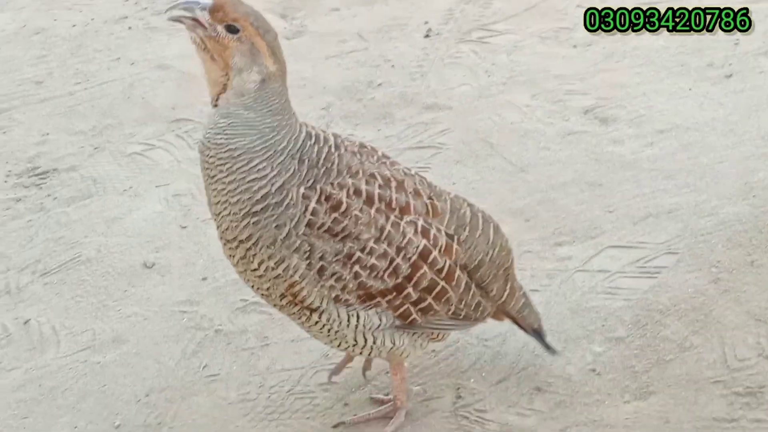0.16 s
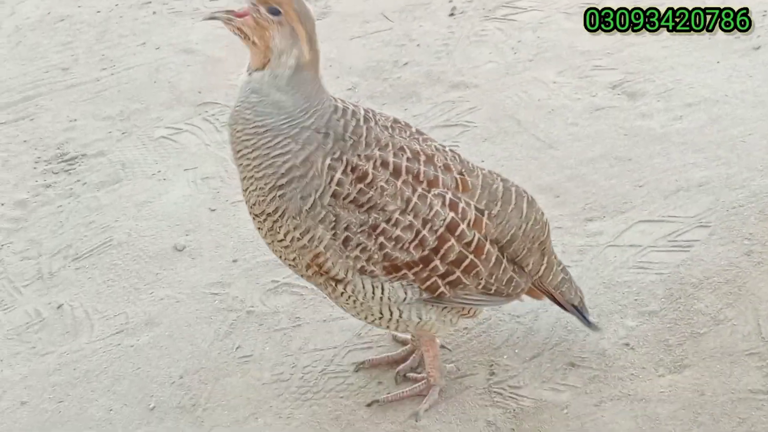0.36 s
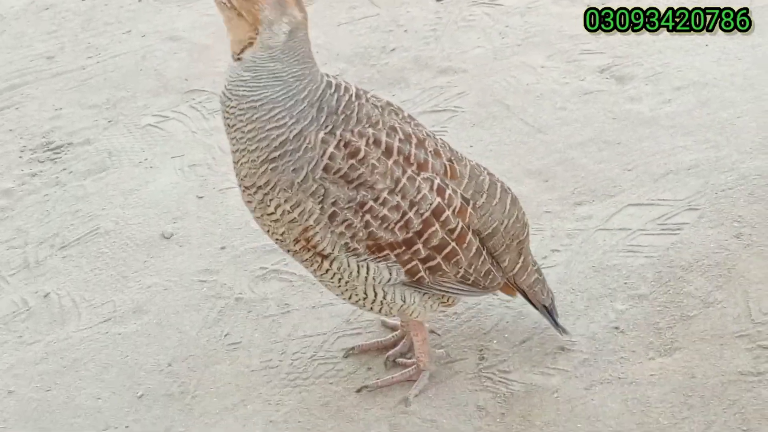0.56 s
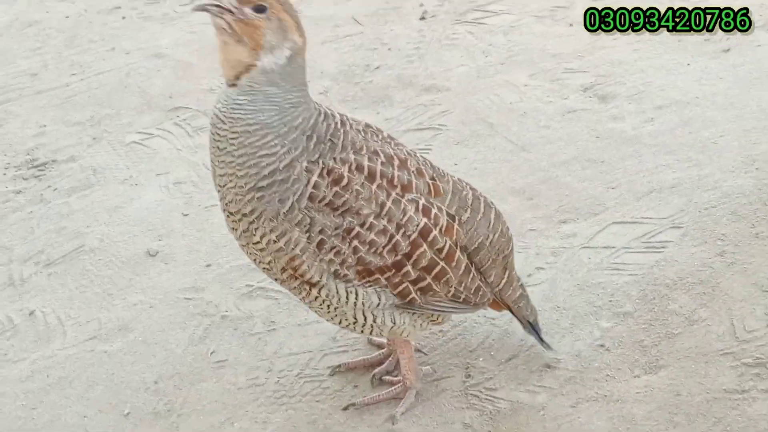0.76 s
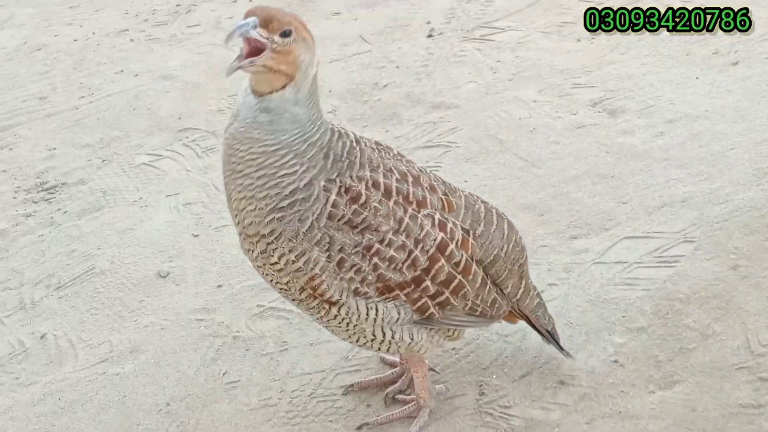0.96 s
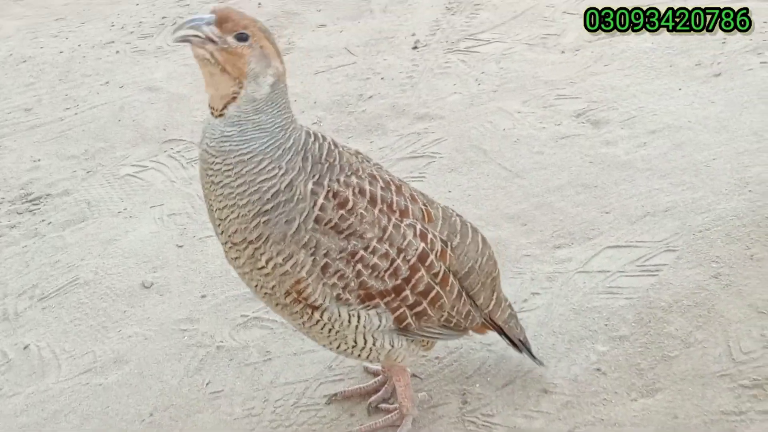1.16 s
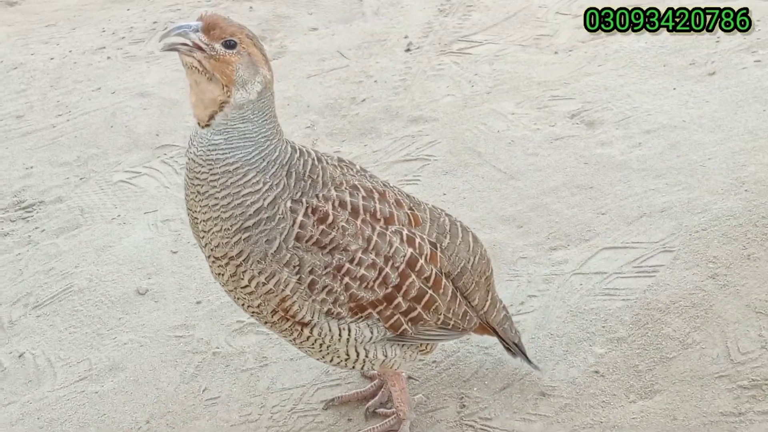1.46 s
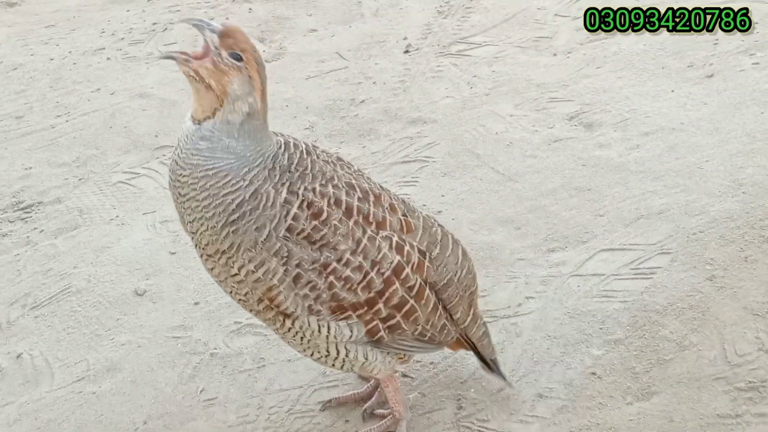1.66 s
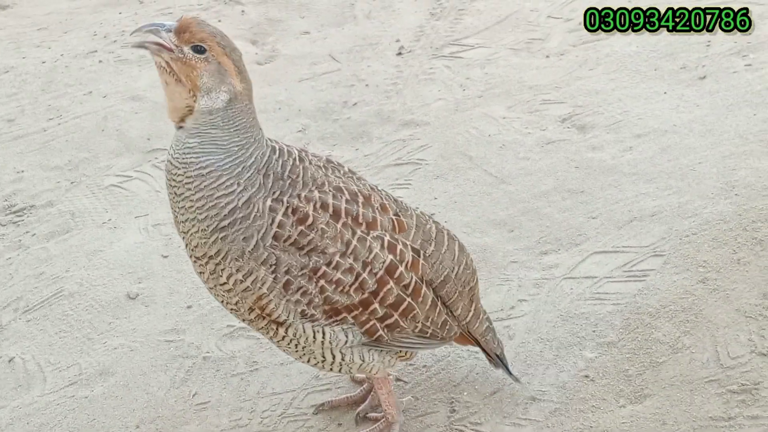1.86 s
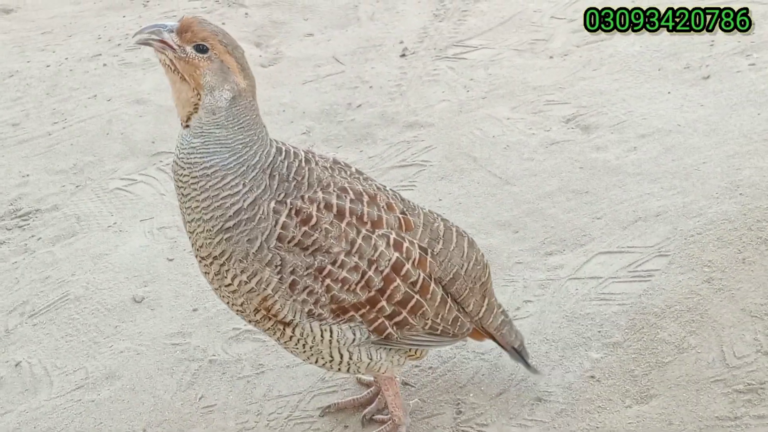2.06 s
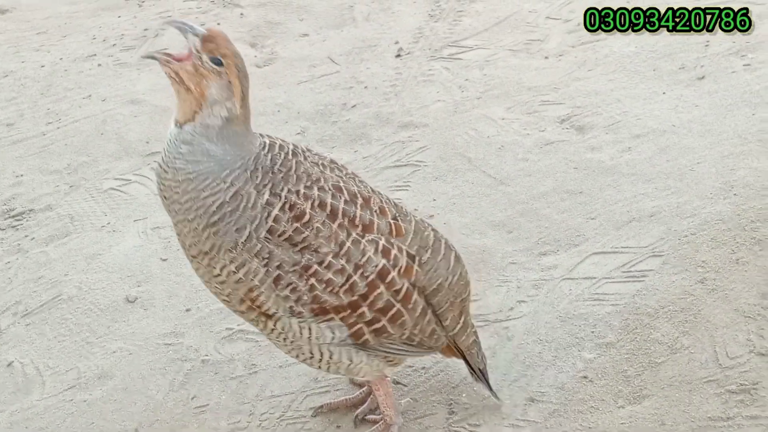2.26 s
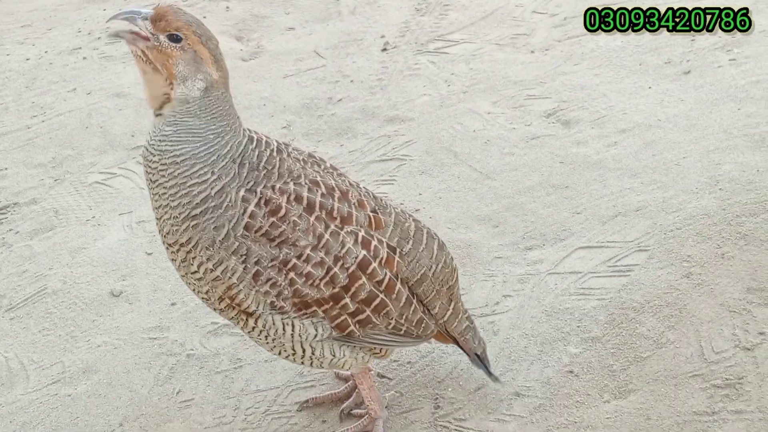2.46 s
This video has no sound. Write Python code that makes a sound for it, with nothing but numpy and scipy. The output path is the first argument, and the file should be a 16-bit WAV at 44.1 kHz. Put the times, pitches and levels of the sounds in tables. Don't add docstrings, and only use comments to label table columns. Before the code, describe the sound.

Close partridge-like bird repeats a rasping two-chuck, shrill whistle and quick falling chirp in an open yard.

```python
import sys
import numpy as np
from scipy import signal
from scipy.fft import rfft, irfft
from scipy.io import wavfile
from scipy.ndimage import uniform_filter1d, minimum_filter1d

SR = 44100
rng = np.random.default_rng(int(sys.argv[2]) if len(sys.argv) > 2 else 0)


def gain_from_db(level_db):
    decades = np.asarray(level_db, float) / 20
    return 10 ** decades


def inscribe(sig):
    pcm = np.round(np.clip(np.atleast_2d(sig).T, -1, 1) * 32767)
    wavfile.write(sys.argv[1], SR, pcm.astype(np.int16))


N = 114660
LEAD = SR // 2
TIME = (np.arange(N + LEAD) - LEAD) / SR

# start t/s, length/s, start f/Hz, end f/Hz, level/dB
FALLS = [
    (-.038, 0.045, 2200, 1556, -20),
    (0.615, .042, 2215, 1565, -19),
    (1.228, .048, 2230, 1529, -20),
    (1.861, .046, 2190, 1588, -16.5),
    (2.482, 0.045, 2194, 1578, -18.5),
]
# start t/s, length/s, f/Hz, level/dB
PIPS = [
    (0.57, 0.021, 2240, -18.5),
    (1.184, 0.019, 2230, -18.5),
    (1.814, 0.021, 2240, -17),
    (2.436, 0.022, 2230, -20),
    (0.541, 0.014, 2200, -25.5),
    (1.155, 0.015, 2200, -34.5),
]
# start t/s, voice lock t/s, end t/s, top f/Hz, tone level/dB
CHUCKS = [
    (0.12, 0.135, 0.17, 1830, -17.5),
    (0.233, 0.248, 0.27, 1720, -15),
    (0.761, 0.777, 0.8089, 1770, -17),
    (0.879, 0.907, 0.91, 1485, -18.5),
    (1.383, 1.401, 1.426, 1720, -19.5),
    (1.496, 1.533, 1.540, 1400, -16.5),
    (2.02, 2.034, 2.0636, 1770, -18.5),
    (2.134, 2.152, 2.17, 1540, -14),
]
# full from t/s, until t/s, attack/s, release/s
BLOWS = [
    (0.357, 0.516, 0.01, 0.011),
    (0.983, 1.123, 0.0068, 0.051),
    (1.618, 1.771, 0.0092, 0.021),
    (2.229, 2.394, 0.008, 0.012),
]


def rms_one(x):
    return x / np.sqrt(np.mean(x ** 2) + 1e-20)


def noise():
    return rng.standard_normal(len(TIME))


def at_hz(points, hz):
    points_hz, points_db = np.transpose(points)
    return np.interp(np.log(hz), np.log(points_hz), points_db)


def colour(x, points):
    hz = np.maximum(np.fft.rfftfreq(len(x), 1 / SR), 1)
    return rms_one(irfft(rfft(x) * gain_from_db(at_hz(points, hz)), len(x)))


def resonate(x, hz, width_hz):
    r = np.exp(-np.pi * width_hz / SR)
    poles = [1, -2 * r * np.cos(2 * np.pi * hz / SR), r * r]
    return signal.lfilter([(1 - r * r) / 2, 0, (r * r - 1) / 2], poles, x)


def twice(x, hz, width_hz):
    return rms_one(resonate(resonate(x, hz, width_hz), hz, width_hz))


def drift(rate_hz):
    return rms_one(signal.sosfilt(signal.butter(2, rate_hz, fs=SR, output="sos"), noise()))


def gate(start, end, attack, release):
    rise = (TIME - start) / max(attack, 1e-4)
    fall = (end - TIME) / max(release, 1e-4) + 1
    return np.sin(np.pi / 2 * np.clip(np.minimum(rise, fall), 0, 1)) ** 2


def bump(centre, width):
    return np.exp(-((TIME - centre) / max(width, 1e-4)) ** 2)


def sine(hz):
    return np.sin(2 * np.pi * np.cumsum(hz) / SR)


def voice(hz, throat, spent, count):
    phase = 2 * np.pi * np.cumsum(hz * (1 + 0.0082 * drift(340))) / SR
    out = 0
    for k in range(1, count + 1):
        loss_db = 12 * spent * max(k - 2, 0) + 4 * max(k - 4, 0)
        shimmer_db = (1.16 + .4 * k) * drift(140)
        out = out + gain_from_db(at_hz(throat, k * hz) - loss_db + shimmer_db) * np.sin(k * phase)
    return out * 2 ** .5


def pulses(rate_hz, jitter, breath):
    cycles = np.cumsum(rate_hz * (1 + jitter * drift(600)).clip(.2)) / SR
    slaps = np.diff(np.floor(cycles), prepend=0) * gain_from_db(2 * noise())
    return rms_one(slaps) + breath * noise()


def open_notes():
    # f/Hz, level/dB
    open_throat = [(1550, 4.5), (1900, -2), (2150, 6), (3700, 2), (4400, -10), (6500, -13.5), (7500, -11.5),
                   (8800, -9.5)]
    bend, attack_s, release_s, catch_db = 1.45, .004, .006, -13
    hz, gain = np.full(len(TIME), 2200.), 0
    catch, spent = np.zeros(len(TIME)), np.zeros(len(TIME))
    held = [(s, length, f, .98 * f, db) for s, length, f, db in PIPS]
    for s, length, from_hz, to_hz, db in sorted(FALLS + held):
        gone = np.clip((TIME - s) / length, 0, 1)
        begun = TIME > s - .002
        hz = np.where(begun, from_hz + (to_hz - from_hz) * gone ** bend, hz)
        spent = np.where(begun, gone * length / .045, spent)
        gain = gain + gain_from_db(db - 5.7 * gone) * gate(s, s + length - release_s, attack_s, release_s)
        catch += gain_from_db(db + 19.5) * gate(s - .002, s + .0005, .0008, 0.0036)
    breath = twice(noise(), 3480, 600)
    return gain * voice(hz, open_throat, spent, count=7) + gain_from_db(catch_db - 4.5) * catch * breath


def sighs():
    level_db, release_s = -33, 0.024
    ends = [s + length for s, length, *_ in FALLS] + [row[2] for row in CHUCKS]
    puff = twice(noise(), 1360, 1800)
    return gain_from_db(level_db) * puff * sum(gate(s - .004, s, 0.0058, release_s) for s in ends)


def yard(x):
    # f/Hz, level/dB
    wall_colour = [(300, -50), (1700, 2), (2300, -4), (3800, -2.5), (6500, 3), (8800, 1), (10000, -14.5)]
    early_t60_s, early_db = 0.11, -13
    late_t60_s, late_db, delay_s = 1.814, -30, 0.0055
    wall_echo_s, wall_echo_db = 0.037, -25.5
    t = np.arange(SR) / SR
    early = gain_from_db(early_db - 60 * t / early_t60_s) / np.sqrt(early_t60_s)
    late = gain_from_db(late_db - 60 * t / late_t60_s) / np.sqrt(late_t60_s)
    onset = np.clip(t / delay_s - 1, 0, 1)
    echo = colour(rng.standard_normal(SR), wall_colour) * (early + late) * onset * 3.16 / np.sqrt(SR)
    echo[int(wall_echo_s * SR)] += gain_from_db(wall_echo_db)
    return signal.fftconvolve(x, echo)[:len(x)]


def open_air():
    # f/Hz, level/dB
    air_colour = [(40, -27.5), (110, -5.5), (170, -16.5), (500, -26.5), (1800, -17.5), (4500, -27.5),
                  (9000, -39.5), (15000, -45.5)]
    return gain_from_db(-55 + 3.7 * drift(11.5)) * colour(noise(), air_colour)


def twitter():
    # start t/s, length/s, start f/Hz, end f/Hz, level/dB
    glides = [
        (0.08, 0.066, 8700, 9400, -64),
        (.68, .06, 9200, 8610, -66),
        (1.44, 0.036, 4400, 3760, -38),
        (2.565, .04, 8965, 9000, -82),
    ]
    out, wobble = 0, drift(750)
    for s, length, from_hz, to_hz, db in glides:
        hz = np.interp(TIME, [s, s + length], [from_hz, to_hz]) * (1 + .06 * wobble)
        out = out + gain_from_db(db) * gate(s, s + length, 0.016, .015) * sine(hz)
    return out


def chucks():
    # level/dB, low throat share/dB, slap rate/Hz
    rasps = [(-12, -8, 1090), (-15, 2, 1070), (-14, -3.5, 1100), (-16, 11.5, 715), (-14, -4.5, 1120),
             (-16.5, 9.5, 730), (-14, -2.5, 1100), (-18, 10, 740)]
    # f/Hz, width/Hz, level/dB; first two are the low throat
    rasp_throat = [(1020, 615, -7.5), (1488, 580, -7), (2230, 363, 8.5), (3317.5, 760, 2.5),
                   (5540, 1600, -19.5), (10100, 9300, -22), (590, 520, -10.5)]
    # f/Hz, level/dB
    chuck_throat = [(1300, 3.5), (1800, 0.5), (2800, -12.5), (3500, 5.5), (4300, -45.5), (5400, -17.5),
                    (6300, -41), (7100, -32)]
    rest_hz, rise = 1357, 1
    attack_s, overlap_s, lead_db = 0.012, 0.0084, -16
    waver_before_s, waver_s, waver_depth = .011, .003, .45
    rebound_after_s, rebound_s, rebound_db = 0.005, 0.0022, -11.5
    rate_hz = np.full(len(TIME), 1000.)
    for row, rasp in zip(CHUCKS, rasps):
        rate_hz[TIME > row[0] - .03] = rasp[2]
    slaps = pulses(rate_hz, jitter=0.25, breath=.35)
    rings = [(-1) ** k * gain_from_db(db) * twice(slaps, f, width) for k, (f, width, db) in enumerate(rasp_throat)]
    low, high = sum(rings[:2]), sum(rings[2:])
    harsh, gain = 0, 0
    hz, spent = np.full(len(TIME), 1500.), np.zeros(len(TIME))
    for (start, lock, end, top_hz, db), (rasp_db, low_db, _) in zip(CHUCKS, rasps):
        swell = gate(start - .003, lock, attack_s, overlap_s)
        swell = swell + gain_from_db(lead_db) * gate(start - .012, start, 0.0088, 0.0095)
        swell = swell + 0.033 * gate(lock, end, 0.012, 0.0099)
        harsh = harsh + gain_from_db(rasp_db - 9.0) * swell * (high + gain_from_db(low_db) * low)
        begun = TIME > start - .02
        path = np.interp(TIME, [lock - .01, lock + 0.0031, end - .012, end],
                         [rise * top_hz, top_hz, 1.05 * rest_hz, rest_hz])
        hz = np.where(begun, path, hz)
        spent = np.where(begun, np.clip((TIME - lock) / (end - lock), 0, 1), spent)
        waver = 1 - waver_depth * bump(end - waver_before_s, waver_s)
        held = waver * gate(lock - .006, end - .001, 0.00424, 0.0036)
        gain = gain + gain_from_db(db) * (held + gain_from_db(rebound_db) * bump(end + rebound_after_s, rebound_s))
    return harsh + gain * voice(uniform_filter1d(hz, size=201), chuck_throat, spent, count=4)


def gulps():
    # t/s, push level/dB, click level/dB, push length/s
    pushes = [
        (0.331, -21.5, -10.5, 0.0021),
        (0.953, -28, -39, 0.0047),
        (0.969, -30, -26, .003),
        (1.588, -21, -15.5, 0.0022),
        (1.595, -28.5, -18, 0.0016),
        (2.2, -21, -9.5, 0.0021),
        (2.209, -20.5, -3.5, 0.0018),
    ]
    # t/s, length/s, f/Hz, level/dB
    false_starts = [
        (0.9752, .0025, 2970, -8),
        (1.607, 0.0048, 3150, -27),
        (2.218, 0.0037, 3040, -20),
    ]
    push_hz, hiss_db = 311.4, -36.5
    out = 0
    click = twice(noise(), 2930, 730)
    puff = colour(noise(), [(1500, -14.0), (3000, 10.5), (5000, -35), (8000, -5.5), (15000, -26.0)])
    for s, push_db, click_db, length in pushes:
        out = out + gain_from_db(push_db) * bump(s - .001, length) * np.sin(2 * np.pi * push_hz * (TIME - s))
        out = out + gain_from_db(click_db - 10.5) * gate(s - .0005, s + 0.00031, 0.0005, 0.0044) * click
        out = out + gain_from_db(hiss_db) * gate(s - .009, s + 0.0054, 0.0036, 0.027) * puff
    for s, length, hz, db in false_starts:
        out = out + gain_from_db(db) * bump(s, length) * np.sin(2 * np.pi * hz * TIME)
    return out


def whistles():
    # t/s, f/Hz
    pitch_curves = [
        [(.347, 3022), (.36, 3160), (.375, 3370), (.395, 3418), (.453, 3324), (.5, 3321), (.523, 3414)],
        [(.971, 2957), (.99, 3204), (1.021, 3440), (1.05, 3470), (1.1, 3393), (1.137, 3295), (1.16, 3500)],
        [(1.61, 3158), (1.63, 3260), (1.651, 3348), (1.711, 3275), (1.75, 3343), (1.771, 3373), (1.786, 3535)],
        [(2.222, 3186), (2.239, 3376), (2.263, 3455), (2.333, 3190), (2.377, 3215), (2.395, 3340),
         (2.408, 3600)],
    ]
    partials_db = [0, -38.5, -18.5, -42]
    level_db = -1.5
    earlier_s = 0.57
    tone, level = 0, 0
    for k, shift in [(0, earlier_s), (0, 0), (1, 0), (2, 0), (3, 0)]:
        s, hz = np.transpose(pitch_curves[k])
        start, end, attack, release = BLOWS[k]
        gain = gate(start - attack - shift, end - shift, attack, release) ** 1.4
        phase = 2 * np.pi * np.cumsum(uniform_filter1d(np.interp(TIME, s - shift, hz), size=661)) / SR
        for m, db in enumerate(partials_db, 1):
            waver_db = (m % 2 == 0) * 3.1 * drift(120)
            tone = tone + gain ** (2 * m - 1) * gain_from_db(db + waver_db) * np.sin(m * phase)
        level = level + gain
    return tone * 2 ** .5 * gain_from_db(level_db + 0.067 * drift(100)), level


def crackle(level):
    # f/Hz, level per Hz/dB
    click_colour = [(40, -12.5), (300, -4.5), (1200, -9), (2400, -5), (3500, 7.5), (4700, -16.5),
                    (6500, -17), (9800, -9.5),
                    (12000, -28), (15500, -29.5)]
    level_db, swell_db, clicks_per_s = -15, 15, 12000
    peak_share = 0.41
    swell = 0
    for start, end, attack, release in BLOWS:
        gone = (TIME - start) / (end - start)
        dip = np.interp(gone, [0, peak_share, 1], [1, 0, .8]) ** 2
        swell = np.where(TIME > start - .02, dip, swell)
    sizes = gain_from_db(2.73 * np.minimum(rng.exponential(1, len(TIME)), 5)) * rng.choice([-1, 1], len(TIME))
    clicks = sizes * (rng.random(len(TIME)) < clicks_per_s / SR)
    gain = gain_from_db(level_db - swell_db * swell + 2.88 * drift(30)) * level ** 2
    return gain * colour(clicks, click_colour)


def burbles():
    # start t/s, end t/s, level/dB
    spans = [
        (0.532, 0.545, -20.5),
        (0.55, 0.59, -24),
        (1.149, 1.206, -23.5),
        (1.783, 1.839, -23.5),
        (2.396, 2.46, -25),
    ]
    # f/Hz, width/Hz, level/dB
    burble_throat = [(2450, 320, -6.5), (3510, 440, 0), (4300, 220, -29), (8400, 5800, -21.5)]
    slap_hz, low_db, flutter_db = 1051, -19.5, 4.5
    slaps = pulses(slap_hz, jitter=0.23, breath=0.86)
    rings = sum(gain_from_db(db) * twice(slaps, hz, width) for hz, width, db in burble_throat)
    low = gain_from_db(low_db + 0.9 * drift(50)) * sine(slap_hz * (1 + 0.0088 * drift(33)))
    gain = sum(gain_from_db(db) * gate(start, end, 0.013, 0.013) for start, end, db in spans)
    pipping = sum(gate(s, s + length - .006, 0.0022, 0.0053) for s, length, *_ in PIPS[:4])
    flutter = gain_from_db(flutter_db * drift(50).clip(-2, 1.5))
    return gain * (1 - 0.65 * pipping) * (rings * flutter + low)


def gain_control(level):
    duck_db, recover_s = 1, 0.026
    r = np.exp(-1 / (recover_s * SR))
    return gain_from_db(-duck_db * np.maximum(level, signal.lfilter([1 - r], [1, -r], level)))


def scene():
    whistle_wet_db = -5
    tone, level = whistles()
    notes = chucks() + open_notes() + burbles() + gulps() + sighs()
    tail = yard(notes + gain_from_db(whistle_wet_db) * tone)
    mix = tone + crackle(level) + notes + gain_control(level) * (tail + open_air()) + twitter()
    return mix[None, LEAD:]


def band_limit(x):
    return signal.sosfilt(signal.butter(12, 15790, fs=SR, output="sos"), x)


def record(dry):
    ceiling, cutoff_hz = .91, 16600
    peak = uniform_filter1d(-minimum_filter1d(-np.abs(dry), size=41), size=21)
    limited = dry / np.maximum(1, peak / ceiling)
    cut = signal.sosfilt(signal.cheby2(12, 70, cutoff_hz, fs=SR, output="sos"), limited)
    return band_limit(cut)


dry = scene()
out = record(dry)
inscribe(out)
```